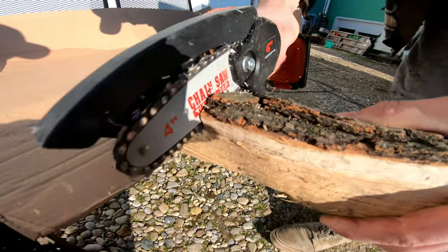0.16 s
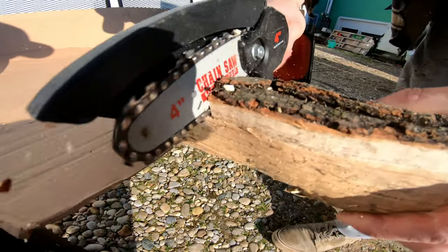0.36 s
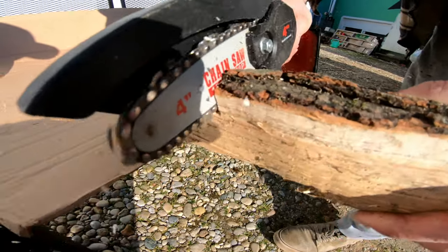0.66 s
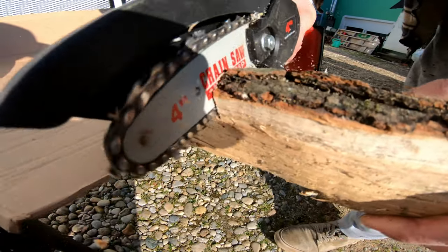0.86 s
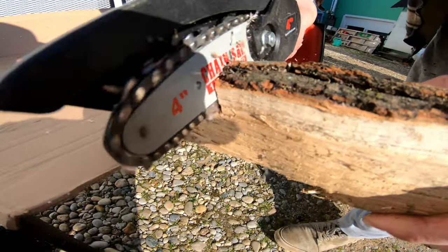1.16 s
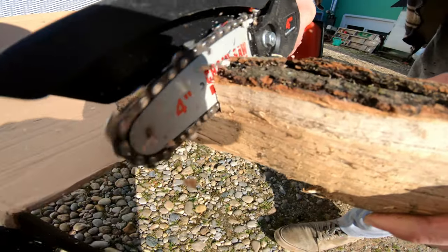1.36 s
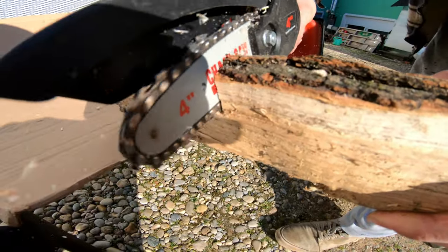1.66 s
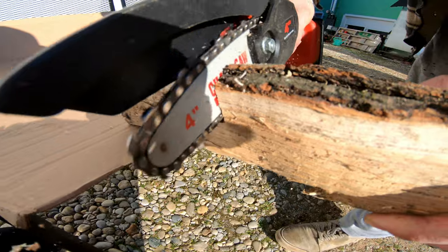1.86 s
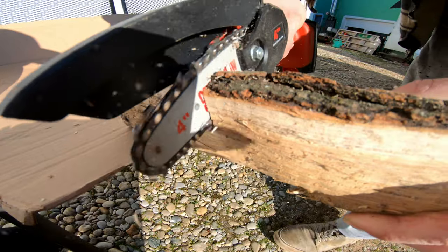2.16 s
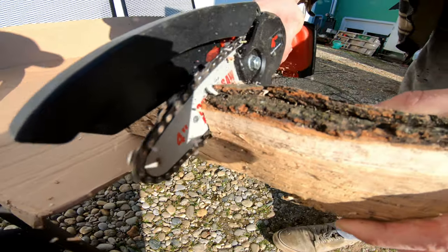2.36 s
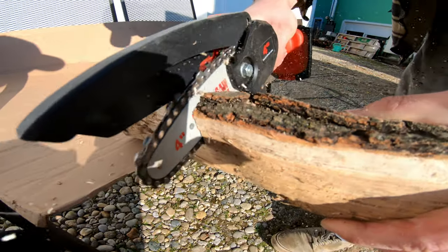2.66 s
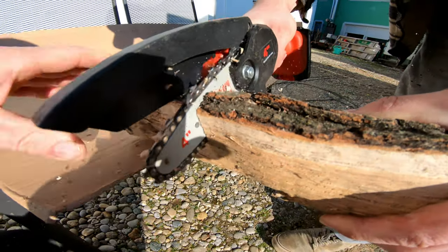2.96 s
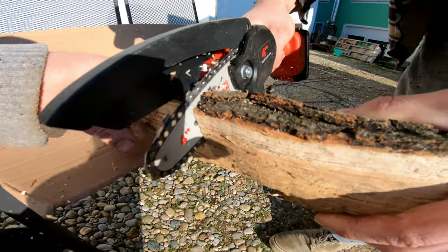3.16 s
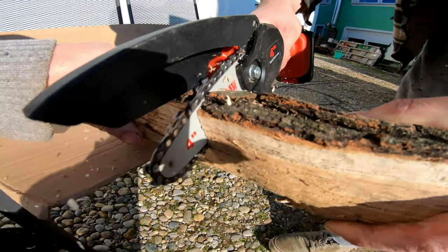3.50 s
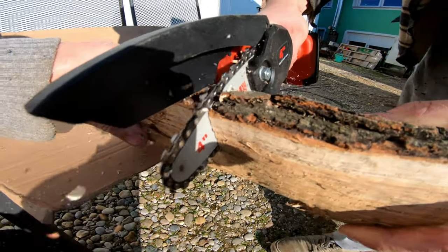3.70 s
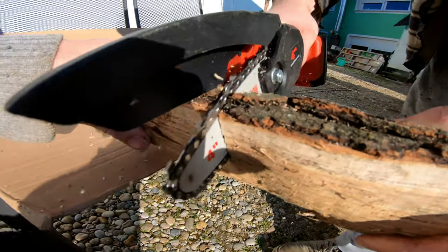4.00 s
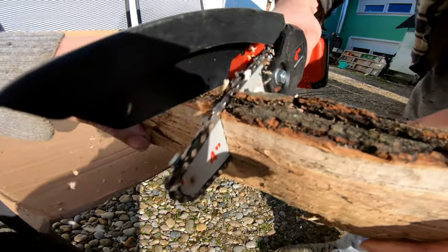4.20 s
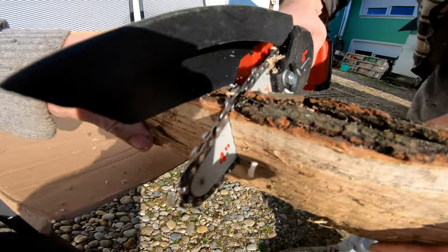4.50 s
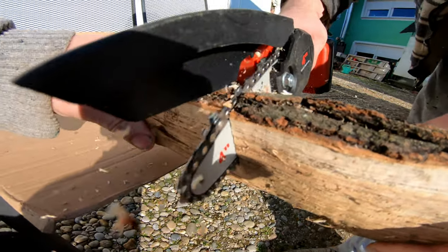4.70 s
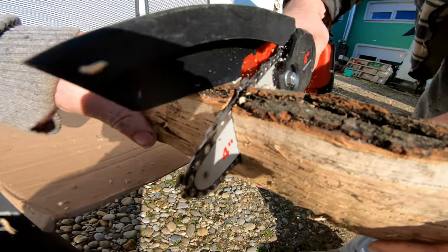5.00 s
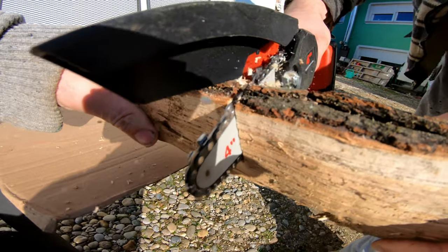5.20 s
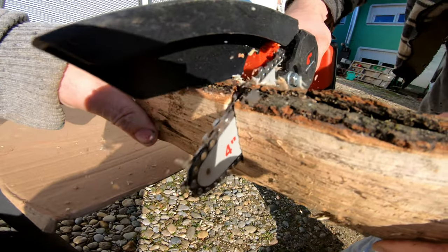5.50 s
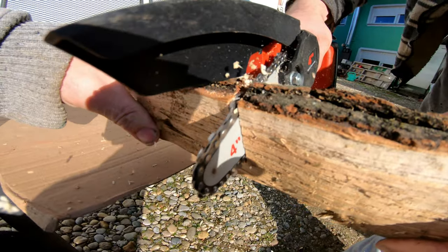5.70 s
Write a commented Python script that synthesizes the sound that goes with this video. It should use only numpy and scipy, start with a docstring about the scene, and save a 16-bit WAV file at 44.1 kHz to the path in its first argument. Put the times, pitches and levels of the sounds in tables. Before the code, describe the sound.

A small electric chainsaw is already cutting as the sound begins and never stops. About forty cutters a second tear the wood in a harsh, buzzing rasp over a nasal, fluttering motor whine. The loose log booms and judders at first, then is steadied while chain rattle grows. Recorded very close outdoors in a faint breeze, dry; the stereo image starts central and opens within a second.

```python
"""A small battery chainsaw cuts through a hand-held log, close to the stereo microphones, in a light breeze.
About 42 cutters a second catch the wood: each tears a cluster of fibres, rings the bar and jolts the log.
The motor's whine dips at every catch and recovers; chain links rattle and chips hiss in between.
Noise bursts through spectra and resonances make the wood and metal; a swept sine makes the whine.
The image starts in the middle and opens out over the first second."""
import sys
import numpy as np
from scipy import signal
from scipy.fft import rfft, irfft, next_fast_len
from scipy.io import wavfile
from scipy.ndimage import uniform_filter1d, map_coordinates

SR = 44100
rng = np.random.default_rng(int(sys.argv[2]) if len(sys.argv) > 2 else 0)


def dump_mix(stems):
    """Bounce the given channels to the path in sys.argv[1] as a 16-bit WAV at rate SR."""
    frames = np.atleast_2d(stems).T  # one column per channel
    limited = np.clip(frames, -1, 1)  # hard clip at full scale
    pcm = np.round(limited * 32767).astype(np.int16)
    wavfile.write(sys.argv[1], SR, pcm)


N = 257984

# Chain speed, bent slightly to meet the hard bites: start_s, cutters_per_s
CHAIN_SPEED = [(0, 39), (1.5, 41.3), (2.1, 44), (3.1, 40.5), (3.5, 44), (4.2, 42), (4.7, 46), (5.3, 42.5),
               (5.85, 44)]
# How hard the cutters catch rather than glide: start_s, chatter (1 = usual)
CHATTER = [(0, 0.76), (.4, 1.28), (1.4, 0.954), (2.6, 1.252), (4.35, 1.05), (4.5, .7), (4.97, 0.34),
           (5.2, 1.3), (5.85, 0.91)]
# The hardest bites; each level counts relative to others: start_s, peak_db, thud_db
HARD_BITES = [(0.0565, -6.5, -28), (0.1525, -12, -11), (0.2807, -7, -16), (0.3221, -9.5, -26),
              (0.3721, -6.5, -15), (0.4232, -10, -25), (0.5796, -5, -11), (0.6371, -9, -14),
              (0.715, -6, -19), (0.8087, -7, -23), (0.885, -9, -12.5), (1.1748, -8, -20),
              (1.3336, -5.5, -19), (1.6903, -10.5, -22), (1.9059, -6.5, -31), (2.1385, -7.5, -19),
              (2.395, -6.5, -22), (2.4628, -5.5, -18), (2.5389, -5, -31), (2.6272, -8, -16),
              (2.7277, -8.5, -50), (2.7918, -7.5, -40), (3.0221, -9, -33), (3.1702, -6, -26),
              (3.3492, -7, -35), (3.5031, -10.5, -30), (3.6885, -6, -26), (4.0423, -8.5, -29),
              (4.3518, -5, -25), (5.1713, -2.5, -31), (5.3422, -6.5, -22)]
# Cutting noise, bar and whine together: start_s, level_db
CUT_LEVEL = [(0, -21), (1.25, -22.5), (2.2, -22.5), (2.7, -22.5), (3.9, -22), (4.45, -23), (4.9, -21),
             (5.85, -25.5)]
# Colour of the tearing wood and the bar: pitch_hz, level_db
BAR_SPECTRUM = [(100, -11.5), (600, -13), (1100, -9.5), (1550, -7.5), (1800, -3), (2020, 6.5), (2250, 0.5),
                (2550, 0), (3100, -2.5), (3700, -11.5), (4250, -17), (5050, -15), (5900, -29),
                (7200, -13.5), (9000, -25.5), (15000, -45)]
# Where the bar stands: start_s, left_minus_right_db
BAR_PLACE = [(0, 6), (.7, 2), (1.3, 3), (2.2, 4), (3.2, 3), (4.2, 2), (5.1, 0.5), (5.85, 0.5)]
# The bar rings freely until the wood grips it: pitch_hz, width_hz, level_db
FREE_BAR_MODES = [(3280, 240, 6), (4720, 240, -7.5)]
# The motor's whine, lower under more load: start_s, mean_pitch_hz
MOTOR_PITCH = [(0, 2550), (.45, 2950), (.9, 2680), (1.05, 2800), (1.4, 2753), (2, 2480), (2.5, 2373),
               (3.6, 2370), (3.95, 2280), (4.25, 2370), (4.55, 2660), (4.76, 2560), (5.02, 2660),
               (5.22, 2440), (5.85, 2408)]
# The whine over the cutting noise: start_s, level_db
WHINE_LEVEL = [(0, -2.5), (1.4, -3.5), (3.3, -2.5), (4.15, 1.5), (4.55, -5.5), (4.95, -3.5), (5.85, 4)]
# How much the log shakes, less once it is steadied: start_s, level_db
LOG_SHAKE = [(0, -22.5), (.28, -20.5), (.47, -24.5), (.58, -21.5), (.95, -20), (1.18, -25), (2.2, -29.5),
             (3.1, -33), (5.85, -32)]
# Resonances of the log in the hands: pitch_hz, width_hz, level_db
HELD_LOG_MODES = [(130, 150, -6), (161.5, 69, -1.5), (248, 130, -13)]
# Resonances of the log while loose: pitch_hz, width_hz, level_db
LOOSE_LOG_MODES = [(192.7, 30, 7.5), (241.5, 19, 4.5)]
# The loose log booms over its held sound until it is steadied: start_s, level_db
LOOSE_BOOM = [(0, 31.5), (.3, 11.5), (.5, -2.5), (.9, 6.5), (1.3, -11.5), (2, -16), (3, -6.5), (5.85, -9)]
# Resonances of the arms that hold the log: pitch_hz, width_hz, level_db
ARM_MODES = [(46.4, 48, 5), (78, 46, 1)]
# Hollow resonances of the log: pitch_hz, width_hz, level_db
HOLLOW_LOG_MODES = [(473.6, 130, 2), (762, 103, 6.5), (840, 78, -6), (1190, 350, -21)]
# Stereo likeness of the hollow log: pitch_hz, likeness (1 = same in both channels)
LOG_ALIKE = [(50, 0.96), (200, 1), (800, 0.96), (1300, 0.61)]
# Chain rattle, louder as the bar sinks in: start_s, level_db
RATTLE_LEVEL = [(0, -48), (.7, -35.5), (1.6, -26.5), (2.3, -27), (2.62, -29), (3.4, -26), (4.25, -25.5),
                (4.92, -23.5), (5.2, -25.5), (5.85, -23.5)]
# Colour of the clattering links: pitch_hz, level_db
LINK_SPECTRUM = [(900, -11.5), (1800, -0.5), (3000, -1.5), (3750, 5), (4450, -8.5), (5400, -1.5),
                 (6100, -1.5), (7250, 5), (8150, -6), (8950, 1), (9900, -8.5), (11000, -23), (15800, -37)]
# Stereo likeness of links and chips: pitch_hz, likeness (1 = same, -1 = opposite)
LINKS_ALIKE = [(1000, -1.26), (3000, 0.91), (4500, 0.88), (6000, 0.29), (7300, -0.33), (9000, 0.16),
               (13000, 0.017)]
# Chip hiss, before its fixed lean to the left: start_s, level_db
CHIP_LEVEL = [(0, -49), (.25, -47.5), (.52, -40), (.9, -46.5), (1.8, -45.5), (2.7, -50.5), (4.9, -45.5),
              (5.2, -48.5), (5.85, -47)]
# Colour of the hissing chips: pitch_hz, level_db
CHIP_SPECTRUM = [(3000, -28), (9000, -14), (11000, -6.5), (12100, 6.5), (13200, -0.5), (14500, -4),
                 (15800, -28)]
# Wind on the microphone ports, before a fixed lift: start_s, level_db
BREEZE_LEVEL = [(0, -54), (3.2, -47), (3.9, -46), (4.25, -39), (4.45, -49), (5, -48), (5.5, -39),
                (5.85, -48)]
# The sound starts in the middle and opens out: start_s, side_db
STEREO_WIDTH = [(0, -56), (.45, -27), (.7, -11), (.95, -0.5), (5.85, -0.5)]

# heave and hollow ring follow the shaking: level at its mean (dB), dB per dB of shaking
HEAVE_DB, HEAVE_FOLLOWS = -29.5, 0.22
RING_DB, RING_FOLLOWS = -32, 0.31
HEAVE_PER_CHATTER_DB = 4  # gliding cutters shove the log a little less
# dense and soft wood make the rattle swell and sink: depth (dB), changes per second
UNEVEN_DB, UNEVEN_PER_S = 1.0, 9
# the dip in pitch at a catch shrinks as the bar seats in the cut: share of the pitch
SAG_START, SAG_END = 0.0702, 0.0353
# until the cut guides it, the bar hops and some cutters barely touch: share at the start, dB, seating time (s)
SKIP_SHARE, SKIP_DB, SEAT_S = .2, -7, 1.1
FREE_BAR_DB, GRIP_DB_PER_S = -32.5, 4.5
TOP_HZ = 15750


def amp(db):
    """Decibels to gain."""
    return 10 ** (np.asarray(db) / 20)


def unit(x):
    """Scale to rms 1."""
    return x / np.sqrt(np.mean(x ** 2) + 1e-20)


def along(points, hz):
    """Read (Hz, value) points on a log frequency axis."""
    f, v = np.transpose(points)
    return np.interp(np.log(hz + 1), np.log(f + 1), v)


def curves(rows):
    """One value per sample for each column after the time."""
    s, *cols = np.transpose(rows)
    return [np.interp(np.arange(N) / SR, s, c) for c in cols]


def filtered(x, response):
    """Filter x by a complex response of frequency."""
    m = next_fast_len(N + SR // 2)
    spectrum = rfft(x, m) * response(np.fft.rfftfreq(m, 1 / SR))
    return irfft(spectrum, m)[..., :N]


def coloured(x, spectrum):
    """Shape x by a table of level over frequency, at rms 1."""
    return unit(filtered(x, lambda hz: amp(along(spectrum, hz))))


def ring(x, modes):
    """Pass x through damped resonances, at rms 1."""
    def response(f):
        return sum(amp(db) * 1j * f * w / (c * c - f * f + 1j * f * w) for c, w, db in modes)
    return unit(filtered(x, response))


def swells(times, sizes, width, delay=0):
    """A bell-shaped swell of the given width (s) at each time."""
    at = np.clip(((times + delay) * SR).astype(int), 0, N - 1)
    t = np.arange(-SR // 20, SR // 20 + 1) / SR
    bell = np.exp(-.5 * (t / width) ** 2)
    return np.abs(signal.fftconvolve(np.bincount(at, sizes, N), bell, "same"))


def snaps(rate, smooth):
    """Tiny random impacts, rate a second, on a smooth rubbing noise."""
    hits = (rng.random(N) < rate / SR) * rng.standard_normal(N)
    return unit(unit(hits) + smooth * rng.standard_normal(N))


def evened(force):
    """The hand's steady push: the force keeps the same power over each quarter second."""
    return force / np.sqrt(np.abs(uniform_filter1d(force ** 2, SR // 4)) + 1e-9)


def wobble(rate):
    """A smooth random curve, rate knots a second."""
    return map_coordinates(rng.standard_normal(1024), [np.arange(N) * rate / SR], mode="wrap")


def spread(a, b, alike):
    """Two unrelated sounds as a stereo pair of the given likeness."""
    def turn(hz):
        return np.arccos(np.clip(along(alike, hz), -1, 1)) / 2
    mid = filtered(a, lambda hz: np.cos(turn(hz)))
    side = filtered(b, lambda hz: np.sin(turn(hz)))
    return np.array([mid + side, mid - side])


def cutters(jitter=0.0012, scatter_db=1.51, hard_db=3.0, hard_jolt_db=2.0, jolt_scatter_db=2,
            thud_share=0.78, lag=.0013):
    """Time, bite and jolt of each cutter; gliding cutters catch less evenly, and a few bite hard."""
    hard_s, peak_db, thud_db = np.transpose(HARD_BITES)
    hard_at = ((hard_s + lag) * SR).astype(int)
    passed = np.cumsum(curves(CHAIN_SPEED)[0]) / SR
    # the cutter count is bent slightly so that a cutter falls on each hard bite
    number = np.cumsum(np.round(np.diff(passed[hard_at], prepend=0)))
    passed = passed + np.interp(np.arange(N), hard_at, number - passed[hard_at])
    at = np.flatnonzero(np.diff(np.floor(passed)))
    chance = rng.standard_normal((len(at), 3))
    chatter = np.clip(curves(CHATTER)[0][at], .2, 2)
    times = at / SR + jitter * chance[:, 0] / chatter
    skipped = rng.random(len(at)) < SKIP_SHARE * np.exp(-at / SR / SEAT_S)
    bite = amp(scatter_db * chance[:, 1] + SKIP_DB * skipped) * chatter
    jolt = amp(jolt_scatter_db * chance[:, 2]) * np.sqrt(chatter)
    # the cutter nearest each hard bite takes its time and strength
    hard = np.abs(at[:, None] - hard_at).argmin(axis=0)
    over_db = thud_db - curves(LOG_SHAKE)[0][hard_at]
    times[hard] = hard_s + lag
    bite[hard] = amp(hard_db + .5 * (peak_db - peak_db.mean()))
    jolt[hard] = amp(hard_jolt_db + thud_share * (over_db - over_db.mean()))
    return times, unit(bite), unit(jolt)


def cutting(times, bite, width_db=-12):
    """Fibres snap in a cluster under each cutter and ring the bar, over the motor's whine."""
    # the force builds slowly and drops as the chip breaks off
    build = swells(times, bite, width=0.0048, delay=0.0017)
    tear = swells(times, bite ** 2, width=0.00061, delay=0.00087)
    slack = np.exp(-.5 * swells(times, bite, width=0.0018, delay=0.0063))
    force = evened((0.29 + 0.46 * build + 0.17 * tear) * slack)
    bar, aside = (coloured(force * snaps(rate=4000, smooth=0.43), BAR_SPECTRUM) for _ in range(2))
    saw = bar + whine(times, bite)
    side = amp(width_db) * aside
    pair = np.array([saw + side, saw - side])
    return unit(pair) * amp(curves(BAR_PLACE)[0] * np.array([[.5], [-.5]]))


def free_bar(times, bite):
    """The cutters ring the steel bar, ever less as it sinks into the cut."""
    strikes = 0.9 + swells(times, bite, width=0.0013)
    fade_db = FREE_BAR_DB - GRIP_DB_PER_S * np.arange(N) / SR
    return amp(fade_db) * ring(strikes * snaps(rate=3000, smooth=0.28), FREE_BAR_MODES)


def whine(times, bite, overtone_db=-22, load_scatter_db=1.5):
    """Each catch brakes the motor, which then speeds up again; the gears sing louder under load."""
    hz, db = curves(MOTOR_PITCH) + curves(WHINE_LEVEL)
    recover_s, flutter, idle, roughness = 0.01245, 0.0141, 0.77, 0.49
    scattered = bite * amp(load_scatter_db * rng.standard_normal(len(bite)))
    load = swells(times, scattered, width=0.00327, delay=.001)
    swing = load - uniform_filter1d(load, SR // 8)
    braking = unit(signal.lfilter([1], [1, -np.exp(-1 / (recover_s * SR))], swing))
    # the speed flutters most while the cutters chatter
    unsteady = coloured(rng.standard_normal(N), [(30, -3.0), (120, 0), (300, -8), (1500, -47.5)])
    fluttering = curves(CHATTER)[0] * unsteady
    speed = hz * (1 - np.linspace(SAG_START, SAG_END, N) * braking + flutter * fluttering)
    turn = 2 * np.pi * np.cumsum(speed) / SR
    mesh = 1 + roughness * coloured(rng.standard_normal(N), [(150, 2), (500, -9), (2000, -52)])
    # the gears strain as a cutter digs in and go slack just after its chip breaks
    strain = idle + swells(times, bite, width=0.0038, delay=-0.00031)
    slack = np.exp(-.8 * swells(times, bite, width=0.0011, delay=0.0074))
    tone = np.sin(turn) + amp(overtone_db) * np.sin(2 * turn)
    return amp(db) * unit(evened(strain * slack) * mesh * tone)


def jolts(times, jolt, thud=0.96, tremble=0.39):
    """The log thuds and judders under the cutters; while loose it also booms."""
    shove = swells(times, jolt, width=0.00094)
    judder = (tremble + swells(times, jolt, width=0.0045)) * rng.standard_normal(N)
    held = unit(ring(judder, HELD_LOG_MODES) + thud * ring(shove, HELD_LOG_MODES))
    body = held + amp(curves(LOOSE_BOOM)[0]) * ring(judder, LOOSE_LOG_MODES)
    return evened(coloured(body, [(40, -4), (110, 4.0), (250, -4.0), (360, -6.5), (1000, -8.5), (4000, -50)]))


def heave(times, jolt, shudder=0.55):
    """Each catch shoves the log against the arms that hold it."""
    shove = unit(swells(times, jolt, width=0.00093, delay=0.00092))
    sway = ring(shove, ARM_MODES) + shudder * ring(rng.standard_normal(N), ARM_MODES)
    return evened(coloured(sway, [(15, -18), (35, -0.5), (110, 5), (300, -30), (1000, -30), (4000, -60)]))


def knocks(times, bite):
    """The log rings hollow as each cutter lets go."""
    release = 0.76 + swells(times, bite, width=0.003, delay=0.0047)
    hollow = ring(release * snaps(rate=900, smooth=0.53), HOLLOW_LOG_MODES)
    return coloured(hollow, [(150, -41), (400, -2.5), (1200, -4), (3000, -15)])


def rattle(times, bite, spectrum, running):
    """Links clatter along the bar and spit chips, most when the chain is pulled tight."""
    tension = evened(running + swells(times, bite, width=0.0065, delay=-0.0019))
    pair = spread(snaps(rate=3000, smooth=0.71), snaps(rate=2700, smooth=1.0), LINKS_ALIKE)
    return coloured(tension * pair, spectrum)


def breeze():
    """Light gusts rumble on each microphone port separately."""
    spectrum = [(15, -25), (45, 14.0), (130, 10), (300, -23), (1000, -39), (6000, -80)]
    air = coloured(rng.standard_normal((2, N)), spectrum)
    return amp(curves(BREEZE_LEVEL)[0] + 5.0) * air


def scene():
    """Log and bar near the middle, the chain all round."""
    shake_db, = curves(LOG_SHAKE)
    loose_db = shake_db - shake_db.mean()
    times, bite, jolt = cutters()
    cut = amp(curves(CUT_LEVEL)[0]) * cutting(times, bite) + free_bar(times, bite)
    heave_db = HEAVE_DB + HEAVE_FOLLOWS * loose_db + HEAVE_PER_CHATTER_DB * (curves(CHATTER)[0] - 1)
    low = amp(heave_db) * heave(times, jolt) + amp(shake_db) * jolts(times, jolt)
    ring_db = RING_DB + RING_FOLLOWS * loose_db
    hollow = amp(ring_db) * spread(knocks(times, bite), knocks(times, bite), LOG_ALIKE)
    uneven_db = UNEVEN_DB * wobble(UNEVEN_PER_S)
    chain = amp(curves(RATTLE_LEVEL)[0] + uneven_db) * rattle(times, bite, LINK_SPECTRUM, running=0.63)
    chips = amp(curves(CHIP_LEVEL)[0] + uneven_db) * rattle(times, bite, CHIP_SPECTRUM, running=1.0)
    # left and right gains (dB): the log leans right, the chips left
    return cut + low * amp([[-.7], [.7]]) + hollow + chain + chips * amp([[2], [-2]]) + breeze()


def record(dry):
    """The stereo image opens during the first second; peaks are rounded and the band is limited."""
    mid = (dry[0] + dry[1]) / 2
    side = (dry[0] - dry[1]) / 2 * amp(curves(STEREO_WIDTH)[0])
    pair = np.array([mid + side, mid - side])
    rounded = pair / (1 + np.abs(pair / .66) ** 6) ** (1 / 6)
    return filtered(rounded, lambda hz: hz < TOP_HZ)


dry = scene()
out = record(dry)
dump_mix(out)
```